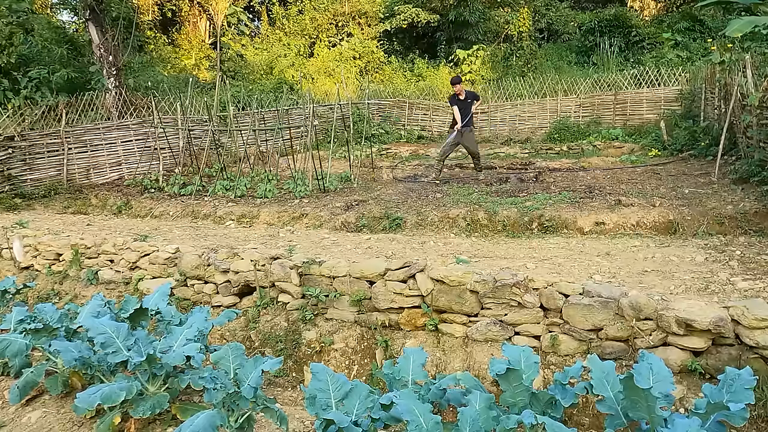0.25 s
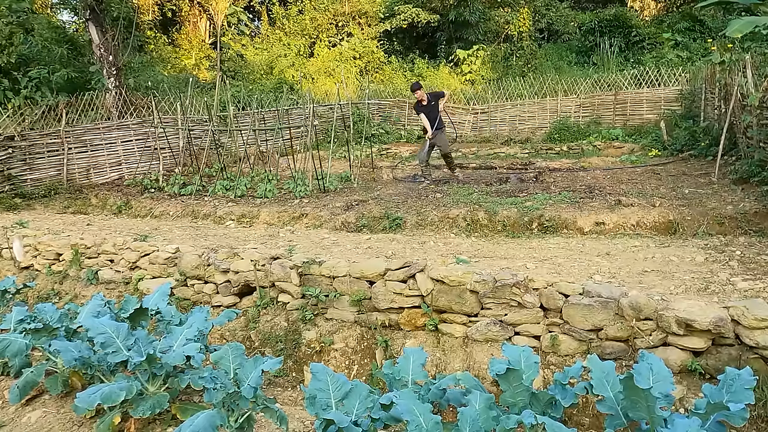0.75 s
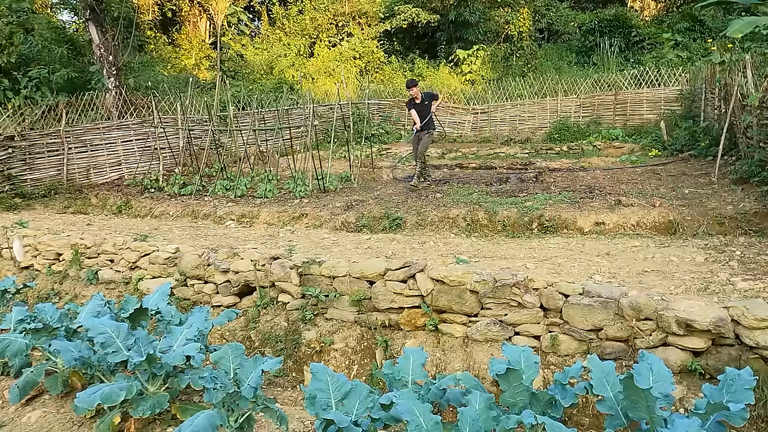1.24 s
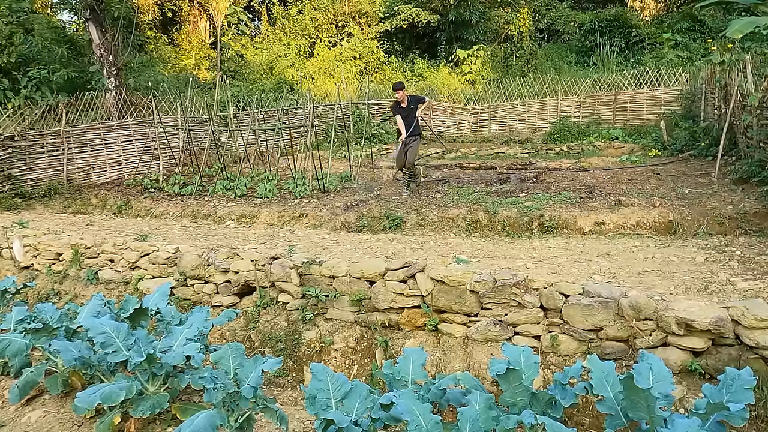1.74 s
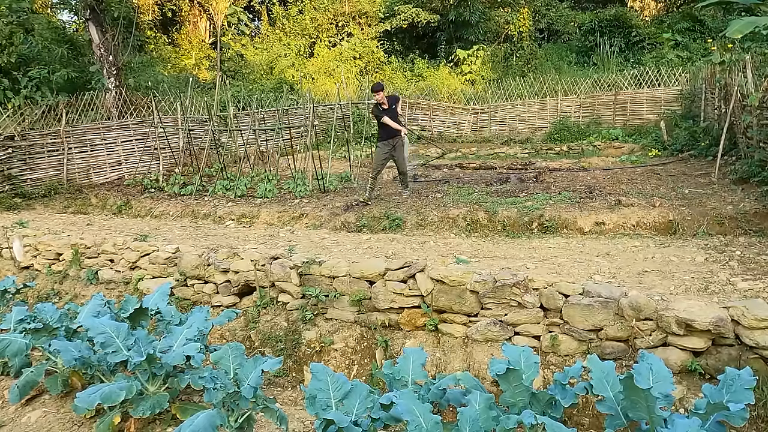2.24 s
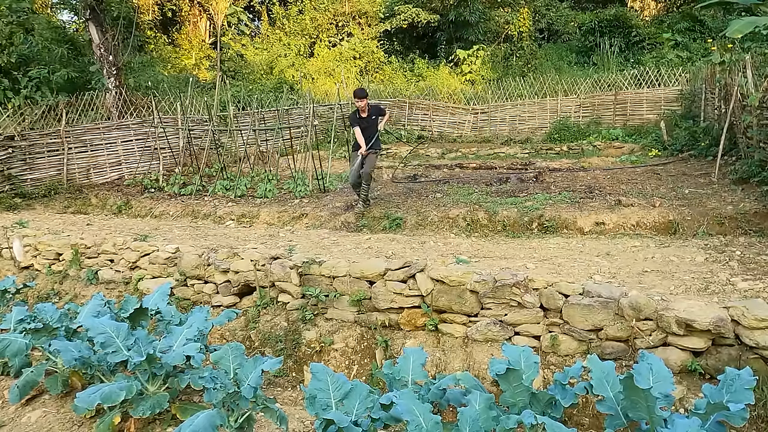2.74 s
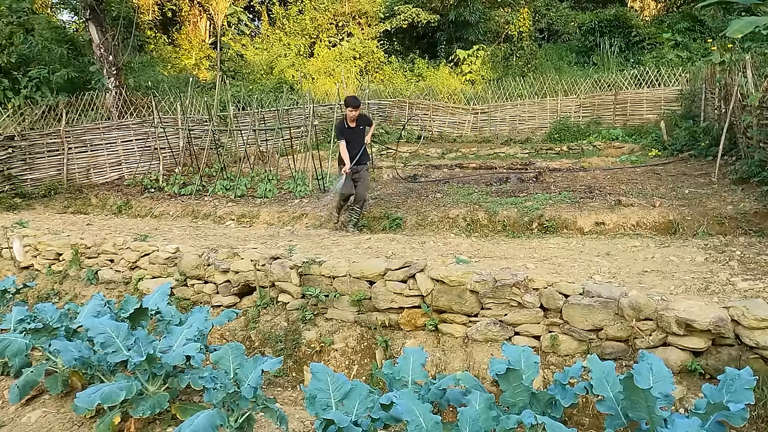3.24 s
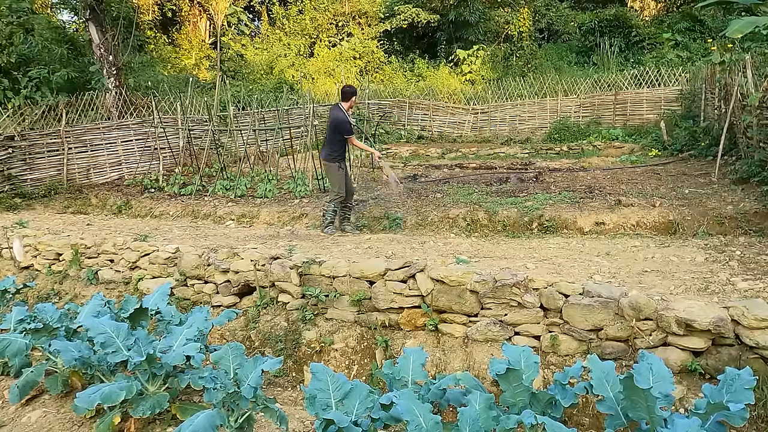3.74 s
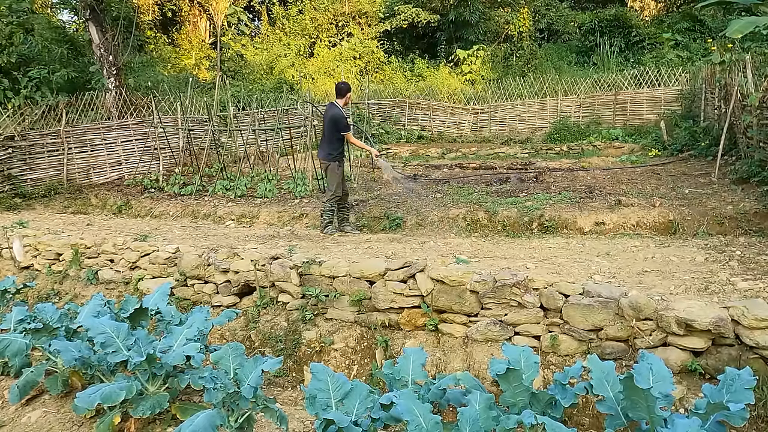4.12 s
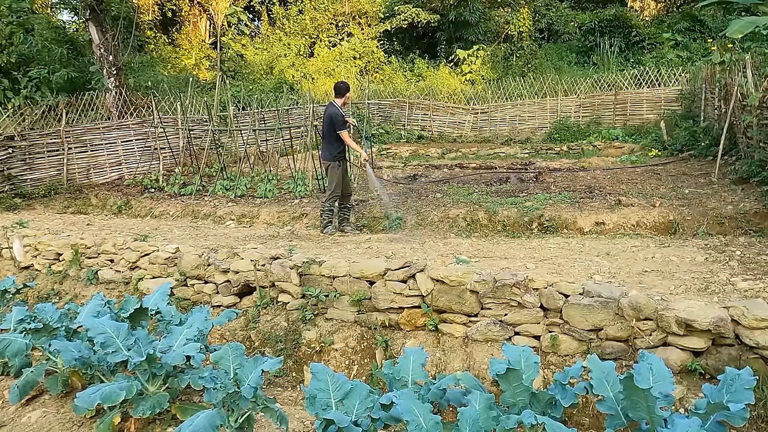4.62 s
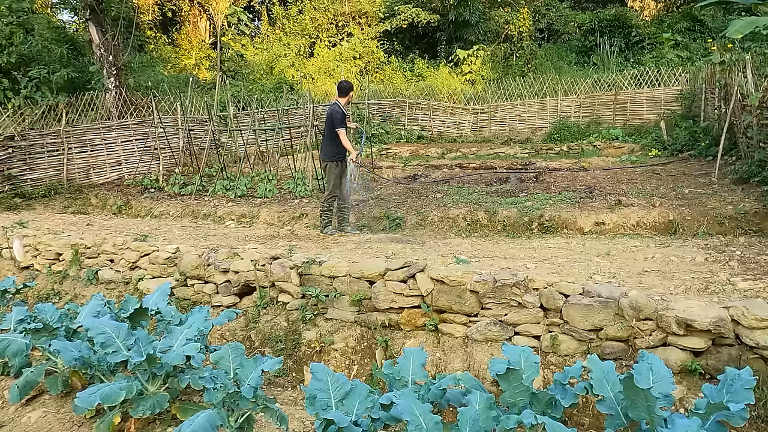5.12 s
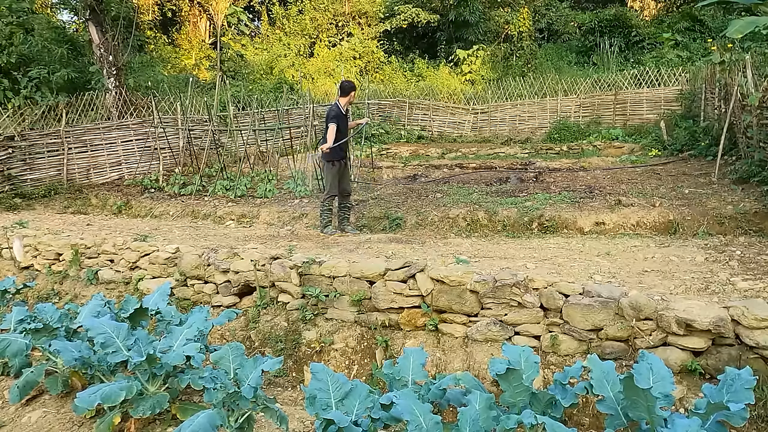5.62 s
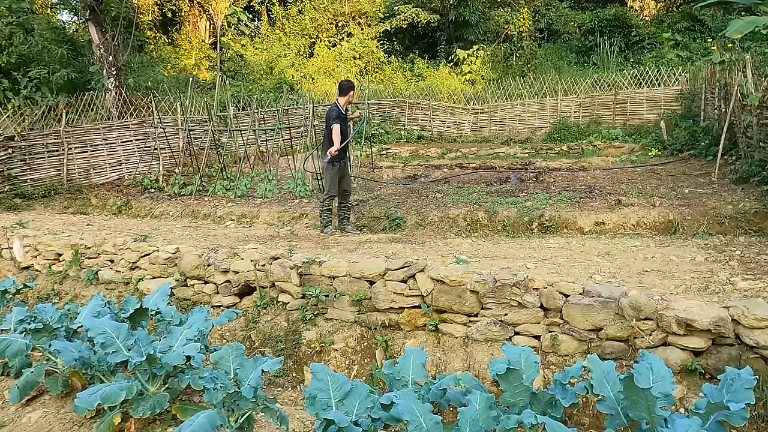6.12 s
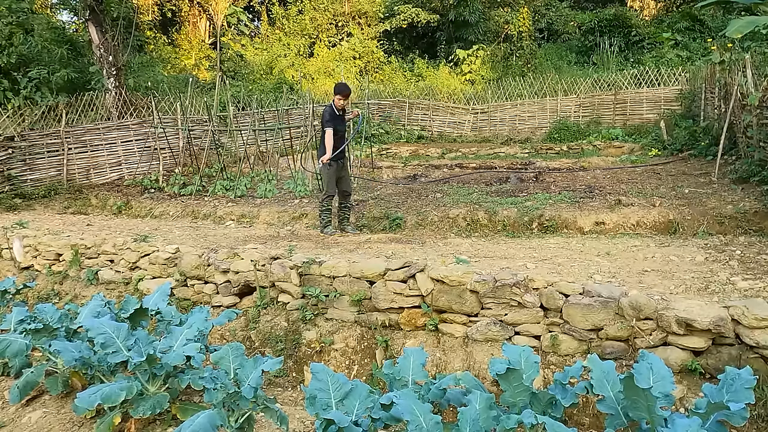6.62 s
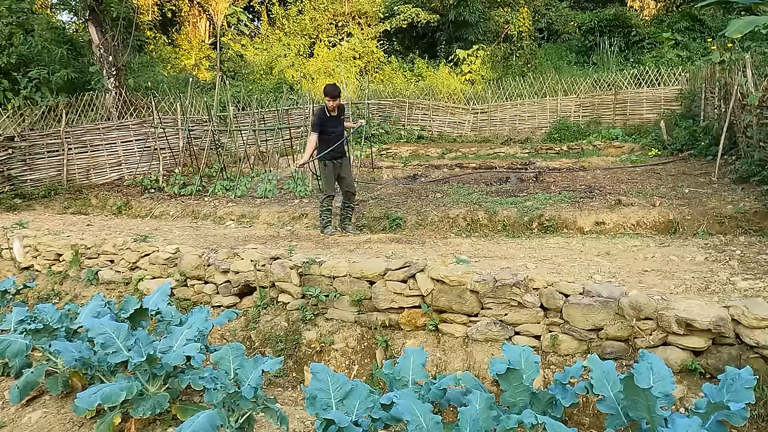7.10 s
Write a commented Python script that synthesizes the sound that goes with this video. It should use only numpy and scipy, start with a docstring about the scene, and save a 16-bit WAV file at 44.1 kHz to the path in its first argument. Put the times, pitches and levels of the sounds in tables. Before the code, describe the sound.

A man waters a plot with a spitting garden hose. Bright, dry cracks with tiny rushes of spray stand well above a quiet swishing jet, light patter, thin constant hiss and low distant hum. A pair of cracks comes midway, then the swishing fades; later pops crowd together, froth sputters, and air and water roar out for under a second before bubbles tick and gurgle upward. Close stereo perspective on the nozzle, open air, short scattered echo.

```python
"""A garden hose waters a vegetable plot over a low far drone and a steady high hiss.
The jet, noise through a gliding resonance, swishes as it swings; random clicks patter on leaves and soil.
Air pockets pop from the nozzle one by one, each a short sine crack and a rush of noise; soft steps follow.
Then the pops crowd into a sputtering run, with froth made of puffs of clicks, and one long roaring blast.
At the end the nozzle gurgles at a climbing pitch among a few last spits and bubbles."""
import sys
import numpy as np
from scipy import signal
from scipy.fft import rfft, irfft
from scipy.io import wavfile

SR = 44100
rng = np.random.default_rng(int(sys.argv[2]) if len(sys.argv) > 2 else 0)


def int16_out(signal):
    """Quantize to a 16-bit WAV file."""
    q = np.round(np.clip(np.atleast_2d(signal).T, -1, 1) * 32767)
    wavfile.write(sys.argv[1], SR, q.astype(np.int16))


N = 324576
TIME = np.arange(N) / SR

# air pockets leaving the nozzle:
# (time [s], crack level [dB], crack pitch [Hz], rush level [dB], rush length [s], rush tilt [dB per octave])
AIR_POCKETS = [(0.4101, -15, 3570, -38, 0.0064, 1), (0.8134, -16, 4250, -35, 0.015, -1.5),
               (1.2405, -12, 4370, -35, 0.011, 12), (1.9606, -13.5, 3560, -31, 0.019, 2.5),
               (4.0221, -20, 3200, -33.5, 0.015, -2), (4.1073, -20.5, 3630, -29.5, 0.0053, 0),
               (4.1430, -41, 1480, -49, 0.016, -8), (4.269, -33.5, 4500, -45, 0.01, -5),
               (4.435, -35.5, 3420, -53.5, 0.0026, -10.5), (4.721, -53, 1400, -57.5, 0.019, -12),
               (5.3344, -34, 3020, -33, 0.029, 0), (5.5817, -38, 3140, -30.5, 0.0035, -1.5),
               (5.6835, -37, 2980, -28.5, 0.011, -1), (5.7342, -12.5, 3120, -29, 0.025, -2.5),
               (5.763, -17.5, 3030, -32, 0.076, -2), (5.868, -26, 3350, -34.5, 0.009, -2),
               (5.936, -32, 2920, -34.5, 0.018, -2), (5.9914, -37, 4100, -34, 0.0059, 1.5),
               (6.109, -42, 4500, -38, 0.019, 2), (6.136, -27, 3230, -34, 0.0087, 0),
               (6.172, -35, 4600, -28.5, 0.016, 1.5), (6.184, -37, 3900, -33.5, 0.058, -2),
               (6.9933, -30, 3250, -34, 0.023, -1), (7.0392, -31, 3600, -36, 0.023, -1),
               (7.2746, -31, 2000, -42, 0.0056, 2)]
# larger bubbles bursting at the nozzle: (time [s], level [dB])
BUBBLE_BURSTS = [(0.9684, -36), (4.179, -31), (5.5566, -40), (5.617, -37.5), (5.8552, -24), (5.9828, -27),
                 (6.4927, -22.5), (7.0871, -24), (7.121, -26), (7.1728, -27.5), (7.196, -30.5),
                 (7.323, -32)]
# the long blast of air and spray: (time [s], level [dB], treble relative to it [dB])
BLAST_COURSE = [(6.2, -36, 0), (6.396, -37.5, -11), (6.424, -40.5, -2), (6.588, -36.5, -3.5),
                (6.78, -37.5, -3), (6.89, -38.5, -7)]
# runs of frothy water before and after the blast: (start [s], length [s], level [dB])
FROTH_RUNS = [(5.696, 0.51, -46.5), (7.198, 0.18, -48)]
# the jet crosses a patch of plants: (start [s], length [s], splash level [dB], fine spray level [dB])
PLANT_PATCHES = [(0.48, 0.6, -58.5, -59.5), (1.85, 1.42, -64, -68), (2.34, 0.18, -58, -79),
                 (3.174, 0.43, -58, -62), (3.556, 0.92, -60, -61), (4.463, 0.68, -56.5, -61),
                 (5.316, 0.37, -65.5, -82)]
# swings of the nozzle: (start [s], length [s], swish level [dB], resonance at full swing [Hz])
NOZZLE_SWINGS = [(0.124, 0.87, -56, 3360), (0.803, 0.58, -58, 3800), (1.695, 0.72, -57.5, 3650),
                 (2.24, 0.86, -57.5, 3680), (3.234, 0.3, -55.5, 3700), (3.54, 0.19, -57, 3580),
                 (3.717, 0.4, -62, 2830)]
# footfalls on soft earth: (time [s], thud level [dB], scuff level [dB], length [s])
FOOTFALLS = [(2.38, -82, -65, 0.11), (2.49, -90, -59.5, 0.06), (3.161, -55, -57, 0.045),
             (3.22, -80, -60.5, 0.045), (3.644, -67.5, -51.5, 0.016)]
# ringing of the wet nozzle mouth: (frequency [Hz], level [dB], decay by 60 dB [s])
MOUTH_RINGS = [(1780, -25, .007), (2000, -24, .018), (7500, -17, .004)]

# spectrum of torn water leaving the nozzle: (frequency [Hz], density [dB])
RUSH_SPECTRUM = [(150, -39), (250, -21), (692, -10.5), (1560, 0.5), (1850, -1.5), (2800, 0), (3450, 0.5),
                 (3760, 1.5), (4100, -0.5), (5410, -0.5), (6210, -3), (7900, -3), (10100, -17.5),
                 (12000, -17), (15500, -45)]
# spectrum of air whistling out of a pocket: (frequency [Hz], density [dB])
WHISTLE_SPECTRUM = [(700, -28), (1450, 0.5), (2300, -11.5), (3600, -8), (4600, 2), (5200, 5.5), (5900, 2.5),
                    (7000, -6), (10000, -40.5), (15500, -54)]
# spectrum of the blast's roar: (frequency [Hz], density [dB])
ROAR_SPECTRUM = [(150, -27.5), (300, -16.5), (430, -2), (560, -9), (700, -2.5), (880, -7.5), (1150, 2.5),
                 (1500, -4.5), (2500, -9), (4500, -7), (8000, -17), (15500, -43)]
# spectrum of the blast's low buffeting: (frequency [Hz], density [dB])
BUFFET_SPECTRUM = [(25, -7), (60, 2), (110, 4), (200, 8), (400, -30), (900, -34)]
# spectrum of a bubble's snap: (frequency [Hz], density [dB])
BUBBLE_SPECTRUM = [(300, -36), (900, -17), (1300, -1.5), (1650, -6), (2400, 2.5), (3500, 5), (6000, 5),
                   (8300, 3.5), (10000, -4.5), (12000, -5.5), (15500, -39)]
# spectrum of drops on soil and leaves: (frequency [Hz], density [dB])
SPLASH_SPECTRUM = [(300, -11), (800, -9.5), (1250, -2), (1800, -1), (2500, -1), (3200, 0.5), (5000, -2.5),
                   (8000, -7.5), (15000, -32)]
# spectrum of the fizzing fine spray: (frequency [Hz], density [dB])
SPRAY_SPECTRUM = [(2000, -38), (4500, -3), (7500, 5.5), (10000, -10.5), (12000, -7), (15500, -34)]
# spectrum of a step's thud: (frequency [Hz], density [dB])
THUD_SPECTRUM = [(20, -7), (55, 0), (110, 3), (200, -7), (500, -48)]
# spectrum of a step's scuff: (frequency [Hz], density [dB])
SCUFF_SPECTRUM = [(80, -24), (180, 5), (320, -9), (480, -1), (700, -19), (1500, -19), (5000, -50)]
# spectrum of the open air: (frequency [Hz], density [dB])
AIR_SPECTRUM = [(25, -5), (60, -2.5), (100, -10.5), (250, -0.5), (400, -0.5), (600, -6.5), (820, -15.5),
                (1200, -3), (2500, -15.5), (4500, -7.5), (9000, -18.5), (15500, -31)]
# spectrum of the far drone: (frequency [Hz], density [dB])
DRONE_SPECTRUM = [(90, -34), (125, -17), (155, -0.5), (178, -0.5), (215, -8), (300, -30.5), (500, -41)]
# spectrum of the steady hiss: (frequency [Hz], density [dB])
HISS_SPECTRUM = [(3000, -32.5), (4600, -13), (5400, -2.5), (5850, 2.5), (6200, 1), (6600, -3), (7300, -8),
                 (9000, -31), (14000, -43)]

# the garden's scattered echo: (frequency [Hz], decay by 60 dB [s])
ECHO_DECAY = [(300, 0.093), (1500, 0.13), (3500, 0.15), (5700, 0.2), (8000, 0.22), (12000, 0.1)]
# likeness of left and right at the nozzle: (frequency [Hz], likeness [0-1])
NEAR_LIKENESS = [(200, 0.87), (1000, 0.98), (4000, 0.81), (8000, 0.91), (12000, 0.38)]
# likeness of left and right farther out: (frequency [Hz], likeness [0-1])
FAR_LIKENESS = [(40, .9), (170, 0.78), (500, 0.22), (2000, 0.67), (6000, 0.85), (12000, 0.47)]
# left minus right for the nozzle: (frequency [Hz], level difference [dB])
NOZZLE_LEAN = [(60, 2), (130, -4), (290, 0), (640, -1), (1410, -1.5), (3100, -1.5), (6820, 1.5), (15000, 2)]


def cracks(rise_s=0.000467, width_s=0.00021, thump_db=-10, ring_db=-22, ring_s=0.00051):
    """Each air pocket breaks out with a crack of a few cycles that rings on briefly."""
    out = np.zeros(N)
    thump = response(RUSH_SPECTRUM, tilt_db=-3.0)
    thump = thump / abs(thump).max()
    t = TIME[:len(thump)]
    snap = np.exp(-((t - rise_s) / width_s) ** 2)
    ring = t / ring_s * np.exp(1 - t / ring_s)
    for s, crack_db, hz, *_ in AIR_POCKETS:
        # halving the dB lets a gentle pocket ring more for its size
        envelope = amp(crack_db) * snap + amp(ring_db + crack_db / 2) * ring
        add(out, s, envelope * np.sin(2 * np.pi * hz * t))
        add(out, s + rise_s, amp(crack_db + thump_db) * thump)
    return out


def rushes(rise_s=0.0014, fall_s=0.0038, grain_db=4.0, flutter_db=1.0,
           whistle_db=-18, spent_db=-7, spent_s=4.2):
    """Air tears water into spray until its pocket is empty, whistling as hard as it cracked."""
    out = np.zeros(N)
    t = TIME[:SR // 5]
    flutter = amp(flutter_db * wander(rate_hz=160))
    for s, crack_db, _, rush_db, length, tilt_db in AIR_POCKETS:
        gate = held(t, length, rise_s, fall_s)
        spray, air, grain = rng.standard_normal((3, len(t)))
        flutter_here = np.roll(flutter, -round(s * SR))[:len(t)]
        torn = unit(spray * amp(grain_db * grain) * flutter_here)
        add(out, s, amp(rush_db) * colour(torn * gate, RUSH_SPECTRUM, tilt_db))
        # late pockets, with less pressure behind them, whistle less
        air_db = crack_db + whistle_db + spent_db * (s > spent_s)
        add(out, s, amp(air_db) * colour(air * gate, WHISTLE_SPECTRUM))
    return out


def blast(start_s=6.185, length_s=0.7097, rise_s=0.008, fall_s=0.009, buffet_db=-32, roar_db=-2.0,
          mist_db=2, jet_db=-7, low_hz=2220, climb_hz_per_s=1300):
    """A long pocket blows out spray in a shifting roar; the jet's resonance climbs as it empties."""
    level_db, treble_db = curve(BLAST_COURSE)
    age = TIME - start_s
    gain = amp(level_db + wander(rate_hz=27)) * held(age, length_s, rise_s, fall_s)

    roar = colour(drops(per_s=18000, spread_db=4.0), ROAR_SPECTRUM)
    roar = amp(roar_db + 1.9 * wander(rate_hz=27)) * roar

    mist = colour(drops(per_s=15000, spread_db=3.0), RUSH_SPECTRUM, tilt_db=-0.05)
    mist = amp(mist_db + treble_db + wander(rate_hz=77)) * mist

    jet_hz = low_hz + climb_hz_per_s * np.clip(age, 0, length_s)
    jet_hz = jet_hz * amp(0.67 * wander(rate_hz=50))
    jet = amp(jet_db) * unit(resonate(drops(per_s=19000, spread_db=4.5), jet_hz, width_hz=1600))

    buffet = colour(rng.standard_normal(N), BUFFET_SPECTRUM)
    buffet = amp(buffet_db + 2 * wander(rate_hz=9.2)) * buffet
    return gain * (roar + mist + jet + buffet)


def froth(puffs_per_s=130, puff_s=0.00096, between=0.14, pops_db=-7, rise_s=0.016, fall_s=0.054):
    """Strings of small bubbles sputter through the nozzle in uneven puffs, with stray pops."""
    level = sum(amp(db) * held(TIME - s, length, rise_s, fall_s) for s, length, db in FROTH_RUNS)
    # a puff starts each time the running count reaches a whole number
    puff_rate = puffs_per_s * amp(4 * wander(rate_hz=60))
    count = np.floor(np.cumsum(puff_rate) / SR)
    starts = np.diff(count, prepend=0) * amp(2 * wander(rate_hz=230))
    puffs = between + signal.lfilter([1], [1, -np.exp(-1 / (puff_s * SR))], starts)
    sputter = unit(drops(per_s=6100, spread_db=2.5) * puffs)
    pops = amp(pops_db) * drops(per_s=49, spread_db=-7.5)
    return mouth(level * (sputter + pops))


def ticks(snap_db=5.0, fizz_db=-16, fizz_s=0.0046, lead_s=0.000854, plip_db=-17, plip_hz=1900, plip_s=0.0017):
    """A bubble snaps, fizzes for a moment and rings with a short decaying plip."""
    snaps, plips = np.zeros((2, N))
    t = TIME[:1024]
    for s, db in BUBBLE_BURSTS:
        fizz = rng.standard_normal(len(t)) * np.exp(-t / fizz_s)
        snap = amp(snap_db) * (t == 0) + amp(fizz_db) * fizz
        add(snaps, s + lead_s, amp(db) * snap)
        hz = plip_hz * rng.uniform(0.84, 1.07)
        plip = np.exp(-t / plip_s) * np.sin(2 * np.pi * hz * t)
        add(plips, s + lead_s, amp(db + plip_db) * plip)
    return mouth(snaps) + plips


def mouth(x):
    """A bursting bubble snaps and sets the nozzle mouth ringing in decaying sines."""
    t = TIME[:2048]
    ring = sum(amp(db - 60 * t / t60) * np.sin(2 * np.pi * hz * t) for hz, db, t60 in MOUTH_RINGS)
    h = response(BUBBLE_SPECTRUM) + ring
    return signal.fftconvolve(x, h / np.linalg.norm(h))[:len(x)]


def trickle(start_s=7.08, length_s=0.3, level_db=-57, low_hz=1600, climb_hz_per_s=1700):
    """Water refills the nozzle after the blast and gurgles at a climbing pitch."""
    age = TIME - start_s
    hz = low_hz + climb_hz_per_s * np.clip(age, 0, length_s)
    hz = hz * amp(0.4 * wander(rate_hz=44))
    gurgle = unit(resonate(drops(per_s=500, spread_db=7.0), hz, width_hz=260))
    return amp(level_db) * held(age, length_s, rise_s=0.12, fall_s=0.03) * gurgle


def swish(core_db=-2, skirt_db=-2, full_swish_db=-55, still_db=-80, still_hz=4870,
          level_shape=0.28, pitch_shape=0.36):
    """The jet swishes as it swings: the faster the swing, the louder and lower its resonance."""
    levels = [amp(db) * arch(s, length, level_shape) for s, length, db, _ in NOZZLE_SWINGS]
    swish_db = 20 * np.log10(np.maximum(np.max(levels, axis=0), amp(still_db)))
    pitches = [still_hz + (hz - still_hz) * arch(s, length, pitch_shape) for s, length, _, hz in NOZZLE_SWINGS]
    swish_hz = np.min(pitches, axis=0)
    # only a strong swish gathers into a narrow, unsteady whistle
    focus_db = 2 * np.minimum(swish_db - full_swish_db, 0) + 2 * wander(rate_hz=11)
    core = unit(resonate(drops(per_s=9000, spread_db=2.0), swish_hz, width_hz=600))
    skirt = unit(resonate(drops(per_s=9000, spread_db=1.5), swish_hz * 1.15, width_hz=3000))
    return amp(swish_db) * (amp(core_db + focus_db) * core + amp(skirt_db) * skirt)


def landing(bare_splash_db=-70, bare_spray_db=-69, sweep_shape=0.61, flight_s=0.023, shower_s=0.051,
            shower_splash_db=-27, shower_spray_db=-30):
    """Drops patter on soil and leaves under fizzing fine spray; each spit lands as a brief shower."""
    # bare soil lies between the patches; independent splashes add as power
    splash_power, spray_power = amp(bare_splash_db) ** 2, amp(bare_spray_db) ** 2
    for start, length, splash_db, spray_db in PLANT_PATCHES:
        cover = arch(start, length, sweep_shape)
        splash_power = splash_power + (amp(splash_db) * cover) ** 2
        spray_power = spray_power + (amp(spray_db) * cover) ** 2

    shower_power = np.zeros(N)
    shower = held(TIME[:SR // 2], shower_s, rise_s=0.045, fall_s=0.11)
    for s, _, _, rush_db, *_ in AIR_POCKETS:
        add(shower_power, s + flight_s, (amp(rush_db) * shower) ** 2)
    splash_power = splash_power + amp(shower_splash_db) ** 2 * shower_power
    spray_power = spray_power + amp(shower_spray_db) ** 2 * shower_power

    splash = colour(drops(per_s=5000, spread_db=3.0), SPLASH_SPECTRUM)
    splash = amp(0.64 * wander(rate_hz=66)) * splash
    spray = colour(drops(per_s=6000, spread_db=5.0), SPRAY_SPECTRUM)
    return np.sqrt(splash_power) * splash + np.sqrt(spray_power) * spray


def steps(rise_s=0.0053, fall_s=0.015):
    """A shoe presses and scuffs the earth: a low and a higher burst of noise."""
    out = np.zeros(N)
    t = TIME[:SR // 3]
    for s, thud_db, scuff_db, length in FOOTFALLS:
        press = held(t, length, rise_s, fall_s)
        heel, sole = rng.standard_normal((2, len(t))) * press
        add(out, s, amp(thud_db) * colour(heel, THUD_SPECTRUM))
        add(out, s, amp(scuff_db) * colour(sole, SCUFF_SPECTRUM))
    return out


def surroundings(air_db=-66, drone_db=-63.5, hiss_db=-58.5):
    """Coloured noises make open air, a low far drone that throbs, and a steady high hiss."""
    air, drone, hiss = rng.standard_normal((3, N))
    air = amp(air_db) * colour(air, AIR_SPECTRUM)
    swell_db = np.interp(TIME, [0, 3.5, 7.36], [-1.5, 1.5, 1.5])  # grows slowly, then stays
    throb_db = 1.3 * wander(rate_hz=3.5)
    drone = amp(drone_db + swell_db + throb_db) * colour(drone, DRONE_SPECTRUM)
    hiss = amp(hiss_db + wander(rate_hz=33)) * colour(hiss, HISS_SPECTRUM)
    return air + drone + hiss


def garden(x, ground_s=.00281, ground_db=-8, echo_db=-10, build_s=0.0074):
    """Soft ground returns an inverted echo; fence, wall and leaves scatter a short tail."""
    ground = np.array([np.interp(TIME - ground_s, TIME, channel) for channel in x])
    bounced = x - amp(ground_db) * ground
    # noise whose bands die away at their own pace
    hz, t, bands = signal.stft(rng.standard_normal((2, SR // 2)), SR, nperseg=128)
    decay = amp(-60 * t / read(ECHO_DECAY, hz)[:, None])
    tail = signal.istft(bands * decay, SR, nperseg=128)[1]
    tail = tail + 0.54 * tail[::-1]  # each side leaks into the other
    tail = tail * (1 - np.exp(-TIME[:tail.shape[1]] / build_s))
    tail = tail / np.linalg.norm(tail[0])
    return bounced + amp(echo_db) * signal.fftconvolve(x, tail, axes=1)[:, :N]


def amp(db):
    """Decibels to gain."""
    return 10 ** (np.asarray(db) / 20)


def unit(x):
    """Scales to rms 1."""
    return x / np.sqrt(np.mean(x ** 2) + 1e-20)


def read(points, hz):
    """Reads a table on a log-frequency axis."""
    f, value = np.transpose(points)
    return np.interp(np.log(hz + 1), np.log(f + 1), value)


def curve(rows):
    """The columns of a time table, at every sample."""
    s, *columns = np.transpose(rows)
    return [np.interp(TIME, s, column) for column in columns]


def add(mix, s, sound):
    """Mixes a sound in at time s."""
    part = mix[max(round(s * SR), 0):][:len(sound)]
    part += sound[:len(part)]


def held(t, length, rise_s, fall_s):
    """An envelope from t = 0: attack, hold for the length, release."""
    attack = 1 - np.exp(-np.maximum(t, 0) / rise_s)
    return attack * np.exp(-np.maximum(t - length, 0) / fall_s)


def arch(start, length, shape):
    """One movement of the arm: 0 to 1 and back, flatter on top for a small shape."""
    u = np.clip((TIME - start) / length, 0, 1)
    return (4 * u * (1 - u)) ** shape


def wander(rate_hz):
    """A slow random swing of rms 1: noise through a soft low-pass."""
    hz = np.fft.rfftfreq(N, 1 / SR)
    slow = rfft(rng.standard_normal(N)) * np.exp(-(hz / rate_hz) ** 2)
    return unit(irfft(slow, N))


def drops(per_s, spread_db):
    """A random train of clicks of rms 1, either sign, their sizes spread by chance."""
    size = amp(spread_db * np.minimum(rng.exponential(1, N), 5)) * rng.choice([-1, 1], N)
    return unit(size * (rng.random(N) < per_s / SR))


def response(points, tilt_db=0, size=2048):
    """Causal impulse response of energy 1 with the given spectrum, tilted per octave."""
    hz = np.fft.rfftfreq(size, 1 / SR)
    level_db = read(points, hz) + tilt_db * np.log2(np.clip(hz, 400, 7000))
    # folding the cepstrum gives minimum phase
    cepstrum = irfft(np.log(amp(level_db)))
    cepstrum[1:size // 2] *= 2
    cepstrum[size // 2 + 1:] = 0
    h = irfft(np.exp(rfft(cepstrum)))
    return h / np.linalg.norm(h)


def colour(x, points, tilt_db=0):
    """Gives x a spectrum."""
    return signal.fftconvolve(x, response(points, tilt_db))[:len(x)]


def resonate(x, hz, width_hz):
    """A resonance that follows the curve hz: shift down to 0 Hz, low-pass, shift back."""
    turn = np.exp(2j * np.pi * np.cumsum(hz) / SR)
    r = np.exp(-np.pi * width_hz / SR)
    return (turn * signal.lfilter([(1 - r) ** 2], [1, -2 * r, r * r], x / turn)).real


def spread(make, likeness):
    """Two channels from two draws of a random sound, as alike as the table says."""
    same = np.clip(read(likeness, np.fft.rfftfreq(N, 1 / SR)), 0, 1)
    mid = rfft(make()) * np.sqrt((1 + same) / 2)
    side = rfft(make()) * np.sqrt((1 - same) / 2)
    return irfft(np.array([mid + side, mid - side]), N)


def scene(walk_s=3.0, start_lean_db=2.5):
    """The nozzle and the falling water in the open garden; the man walks from right to middle."""
    wide = spread(lambda: rushes() + blast() + froth() + trickle(), NEAR_LIKENESS)
    nozzle = garden(cracks() + ticks() + wide)
    lean_db = read(NOZZLE_LEAN, np.fft.rfftfreq(N, 1 / SR))
    nozzle = irfft(rfft(nozzle) * amp(np.array([lean_db, -lean_db]) / 2), N)
    right_db = start_lean_db * np.maximum(1 - TIME / walk_s, 0)
    nozzle = nozzle * amp(np.array([-right_db, right_db]) / 2)

    water = spread(lambda: landing() + swish(), FAR_LIKENESS)
    rest = water + spread(surroundings, FAR_LIKENESS) + steps()
    return nozzle + rest * amp([[-.4], [.4]])  # the rest leans a little to the right


def record(dry, edge_hz=15900):
    """A steep low-pass closes off the top of the treble."""
    low_pass = signal.firwin(511, edge_hz, window=("kaiser", 9), fs=SR)
    return signal.oaconvolve(dry, low_pass[None], "same")


dry = scene()
out = record(dry)
int16_out(out)
```